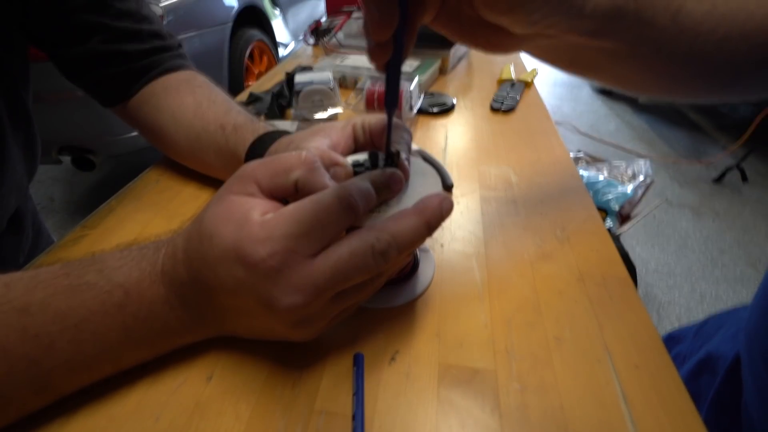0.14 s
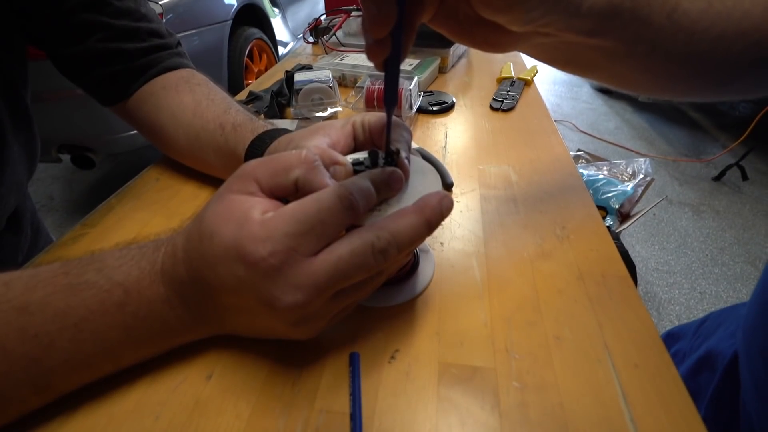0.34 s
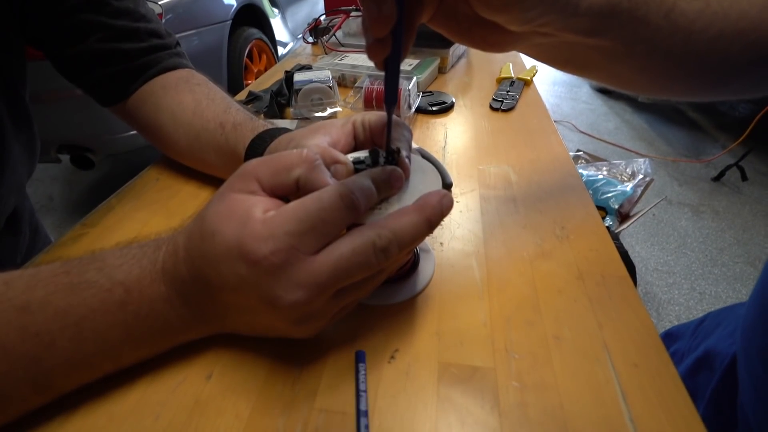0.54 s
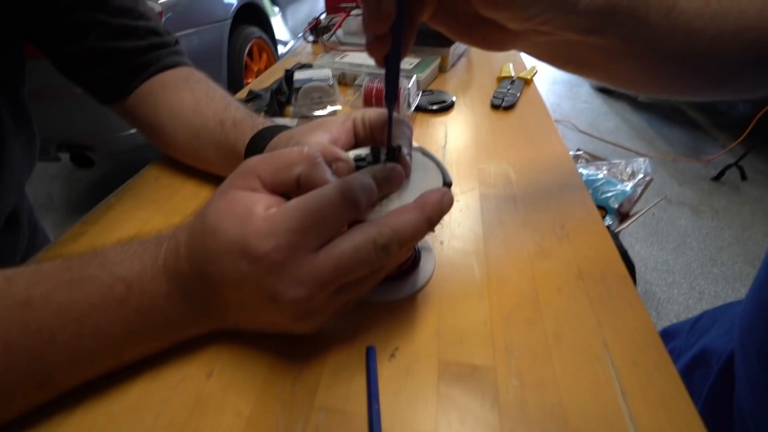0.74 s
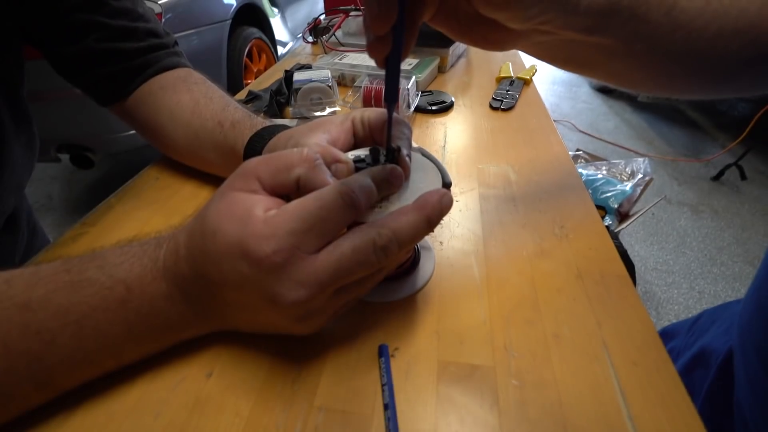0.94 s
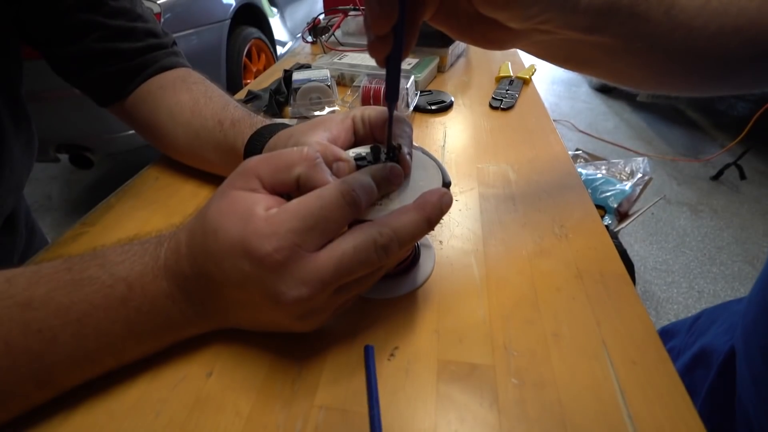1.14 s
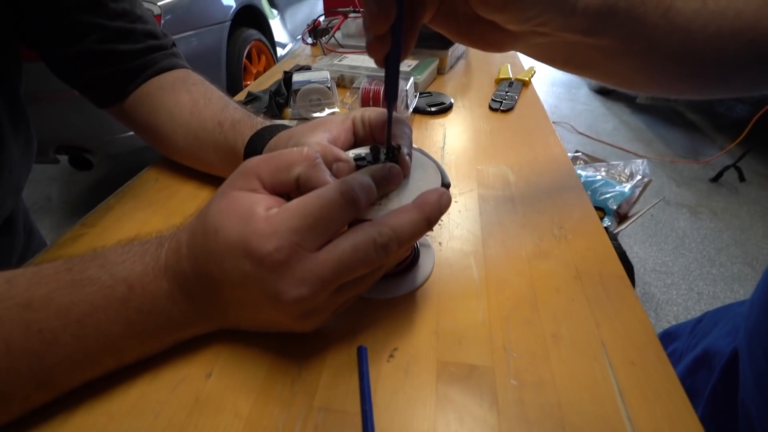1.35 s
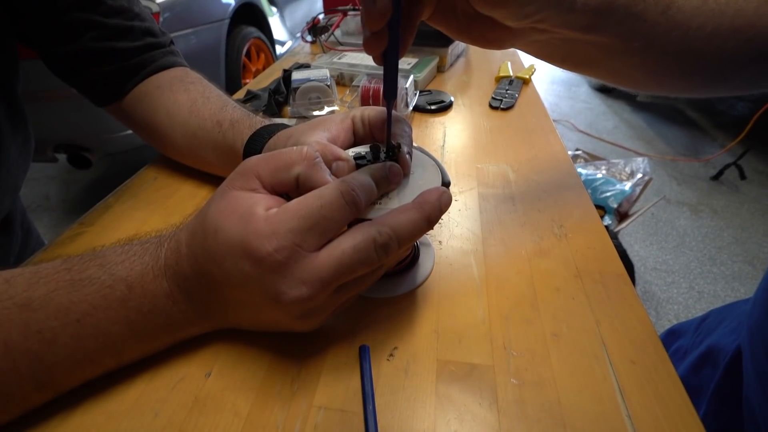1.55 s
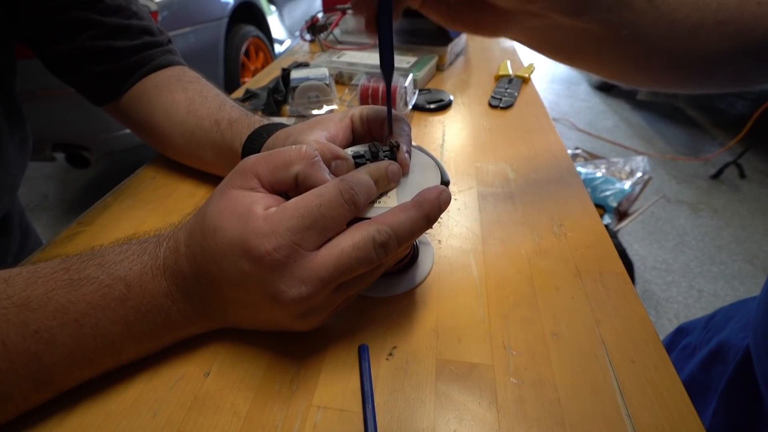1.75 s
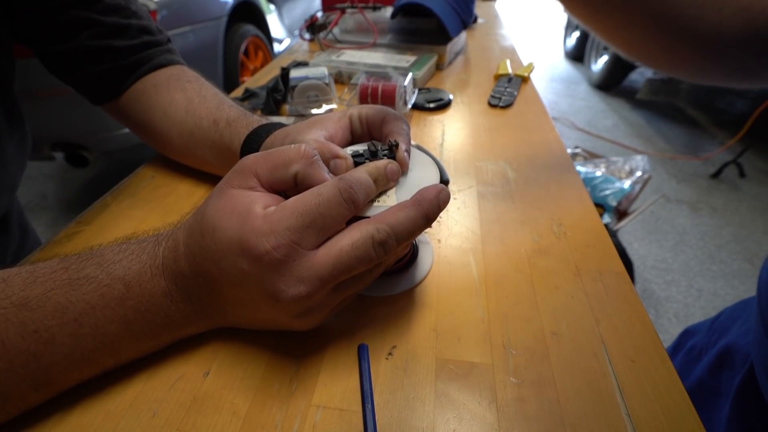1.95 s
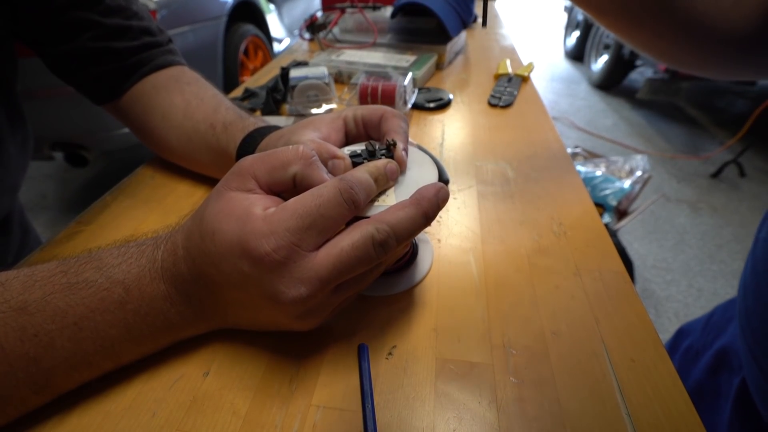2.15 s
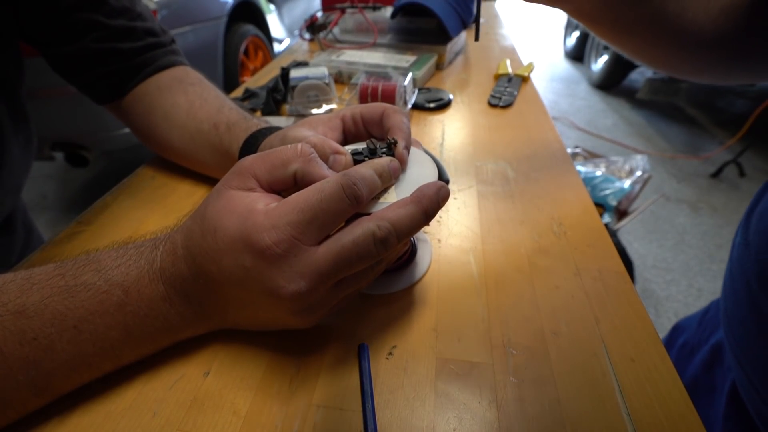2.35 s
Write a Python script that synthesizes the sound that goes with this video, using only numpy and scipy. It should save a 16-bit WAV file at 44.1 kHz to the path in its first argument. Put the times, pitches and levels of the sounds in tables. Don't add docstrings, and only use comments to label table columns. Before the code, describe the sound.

A hammer hits a steel punch on a wooden bench in five quick, even blows, each with a woody boom and rattle of loose tools, then quiet garage hum; close, small overloading microphone.

```python
import sys
import numpy as np
from scipy import signal
from scipy.fft import rfft, irfft
from scipy.io import wavfile
from scipy.ndimage import uniform_filter1d

SR = 44100
rng = np.random.default_rng(int(sys.argv[2]) if len(sys.argv) > 2 else 0)


def master(y):
    cut = np.clip(np.atleast_2d(y).T, -1, 1)
    pcm = np.round(cut * 32767)
    wavfile.write(sys.argv[1], SR, pcm.astype(np.int16))


def gain_from_decibels(decibels):
    exponent = np.asarray(decibels, float) / 20
    return 10 ** exponent


N = 110250

# start_s, strength_db, tick_db
BLOWS = [
    (-.09, -1, 0),
    (.2028, 1.5, -1.5),
    (0.4948, 3, 3.5),
    (0.7842, 4.5, 5.5),
    (1.0505, 4, 6.5),
    (1.3543, 1, 1.5),
]
TICK_DB, TICK_S, CRACK_DB, CRACK_T60_S = -24, 0.0016, 2, 0.049
# freq_hz, density_db_per_hz
TICK_SPECTRUM = [(710, -2), (1200, 7), (2300, -19.5), (4220, -45), (5530, -15.5), (11200, -27.5),
                 (13200, -24), (16000, -31)]
# pitch_hz, level_db, t60_s
PUNCH_MODES = [(3632, -18, 0.014), (1600, -19.5, 0.01), (2640, -32, 0.042), (6720, -29, 0.0064)]
# delay_s, level_db
ECHOES = [(.0036, -3), (.0075, -35), (0.014, -10.5)]
BOOM_LAG_S, PUSH_DB, PUSH_S = .0008, 5, 0.00104
REBOUND_DB, REBOUND_HZ, REBOUND_T60_S = 3.5, 173.3, 0.023

# pitch_hz, level_db, t60_s
BENCH_MODES = [(87.9, -9.5, .3), (181.8, -3.5, 0.32), (266.3, -7.5, 0.4), (280.2, -8.5, 0.43),
               (362.5, -5.5, 0.33), (431.9, -5, 0.25), (454.3, -9, 0.36), (502, -10.5, 0.36),
               (585, -11, 0.38), (710, -51, 0.067), (770, -5, 0.18), (830, -3.5, 0.25), (986, -6.5, 0.28),
               (1071, -16, 0.24)]
BENCH_DB, BLOW_SCATTER_DB, DETUNE_RATIO = -14, 1.5, .0062
SPLIT_HZ, TWIN_DB = 17, -2
# freq_hz, density_db_per_hz
TAIL_SPECTRUM = [(24, -55), (40, -9), (167, 1), (790, -4.5), (1120, -16), (7000, -40.5), (8770, -43.5),
                 (9450, -46), (16000, -43)]
TAIL_DB, TAIL_RISE_S = -19.5, 0.004
# freq_hz, t60_s
GARAGE_DECAY = [(60, 0.25), (200, 0.99), (500, 0.72), (1000, 0.87), (3000, 1), (8000, 0.61), (15000, 0.27)]

# peak_s, level_db
RATTLES = [(-.05, -22.5), (.24, -27.5), (.536, -25.5), (.829, -24), (1.095, -26.5), (1.391, -30.5)]
RATTLE_RISE_S, RATTLE_FALL_S, RATTLE_THUMP_DB = 0.011, .016, -9.5
# freq_hz, density_db_per_hz
RATTLE_SPECTRUM = [(650, -8), (1100, -3), (3010, -11.5), (4130, -12.5), (5340, -19.5), (9140, -23.5),
                   (16000, -51)]
# start_s, level_db, spread_s, thump_db
BOUNCES = [(.26, -34, 0.023, -9.5), (.554, -17.5, 0.0096, -8.5), (0.586, -24.5, 0.0054, -41),
           (0.8621, -20, .007, -9), (0.916, -31, 0.0082, -15.5), (1.125, -22.5, 0.008, -12),
           (1.162, -20.5, 0.0042, -46), (1.185, -31, .004, -44), (1.205, -26.5, 0.0057, -25.5),
           (1.229, -34.5, 0.015, -49), (1.401, -19.5, 0.0032, -46), (1.431, -25.5, 0.0034, -25.5),
           (1.456, -34.5, 0.013, -38), (1.935, -47, .003, -55), (2.041, -43.5, .004, -54),
           (2.48, -57, .003, -45)]
# freq_hz, density_db_per_hz
CLATTER_SPECTRUM = [(500, -40), (1100, -4), (1800, -1.5), (2300, -11.5), (4000, -18.5), (7000, -33.5),
                    (10000, -43), (16000, -60)]
THUMP_TILT_DB_PER_OCTAVE = 1
LANDING_LEAD_S = .025

# start_s, length_s, pair_db, upper_db, upper_hz, low_db
RINGS = [
    (.563, 0.25, -61, -52, 9290, -70),
    (.864, 0.18, -53.5, -51.5, 9230, -45),
    (1.161, 0.23, -52, -56, 9280, -44.5),
    (1.426, 0.172, -59.5, -61, 9300, -45),
]
# first_hz, second_hz
PAIR_HZ = (6848, 6918)
PAIR_T60_S, TWIN_EXTRA_T60_S, UPPER_T60_S = 1.6, 0.67, 0.65
LOW_RING_HZ, LOW_T60_S, RING_RISE_S = 3142, 0.39, 0.018
WAVER_DB, WAVER_S = 2, 0.018

# time_s, level_db
SHUFFLE = [(0, -58.5), (.2, -58), (.5, -58), (.8, -61), (1.4, -80), (2.5, -70.5)]
# low_hz, high_hz
SHUFFLE_BAND_HZ = (3280, 8700)

# freq_hz, density_db_per_hz
HUM_SPECTRUM = [(15, -40), (25, -4.5), (161, 0), (394, -10.5), (545, -4.5), (863, -13.5), (1020, -13),
                (4370, -32), (16000, -57)]
HUM_DB = -42.5
# pitch_hz, peak_db
WHINES = [(172, -50.5), (572, -68.5), (989, -57), (4280, -76), (5200, -77), (10400, -84)]

AIR_DB, AIR_HZ, TOP_HZ = -73, 9000, 15700
CLIP, KNEE, LOW_CUT_HZ = .88, 10, 50


def evened(x):
    return x / np.sqrt(np.mean(x ** 2) + 1e-20)


def read(points, hz):
    f, value = np.transpose(points)
    return np.interp(np.log(hz + 1), np.log(f + 1), value)


def add(mix, s, sound):
    at = round(s * SR)
    sound = sound[max(-at, 0):]
    part = mix[max(at, 0):][:len(sound)]
    part += sound[:len(part)]


def coloured(spectrum, size):
    gain = gain_from_decibels(read(spectrum, np.fft.rfftfreq(size, 1 / SR)))
    return evened(irfft(rfft(rng.standard_normal(size)) * gain, size))


def blows():
    out, t = np.zeros(N), np.arange(4096) / SR
    for s, db, tick_db in BLOWS:
        steel_db = db + tick_db
        tick = t / TICK_S * np.exp(1 - t / TICK_S) * coloured(TICK_SPECTRUM, size=4096)
        crack_shape = gain_from_decibels(CRACK_DB - 60 * t / CRACK_T60_S) * np.minimum(t / TICK_S, 1)
        crack = crack_shape * coloured(TICK_SPECTRUM, size=4096)
        add(out, s, gain_from_decibels(steel_db + TICK_DB) * (tick + crack))
        for hz, mode_db, t60 in PUNCH_MODES:
            add(out, s, gain_from_decibels(steel_db + mode_db - 60 * t / t60) * np.sin(2 * np.pi * hz * t))
        for delay, echo_db in ECHOES:
            add(out, s + delay, gain_from_decibels(steel_db + TICK_DB + echo_db) * np.gradient(tick) * 2)

        boom_s = s + BOOM_LAG_S
        push = -gain_from_decibels(PUSH_DB) * np.sin(np.pi * np.minimum(t / PUSH_S, 1))
        rebound = gain_from_decibels(REBOUND_DB - 60 * t / REBOUND_T60_S) * np.sin(2 * np.pi * REBOUND_HZ * t)
        add(out, boom_s, gain_from_decibels(db) * push)
        add(out, boom_s + PUSH_S, gain_from_decibels(db) * rebound)
        add(out, boom_s, gain_from_decibels(db + BENCH_DB) * bench(BLOW_SCATTER_DB, phase_spread_rad=0.93))
        add(out, boom_s, gain_from_decibels(db) * garage_tail())
    return out


def bench(scatter_db, phase_spread_rad, tilt_db=0):
    t = np.arange(SR // 2) / SR
    hz, db, t60 = np.transpose(BENCH_MODES)[:, :, None]
    draws = rng.standard_normal((4, len(BENCH_MODES), 1))
    scatter, detune, phase, split = np.clip(draws, -1.5, 1.5)
    level_db = db + scatter_db * scatter + tilt_db * np.log2(hz / 500) - 60 * t / t60
    turn = 2 * np.pi * hz * (1 + DETUNE_RATIO * detune) * t + phase_spread_rad * phase
    split_hz = SPLIT_HZ * (split + np.sign(split) / 2)
    twin = gain_from_decibels(TWIN_DB) * np.sin(turn + 2 * np.pi * split_hz * t)
    return -(gain_from_decibels(level_db) * (np.sin(turn) + twin)).sum(0)


def garage_tail():
    hz, t, z = signal.stft(coloured(TAIL_SPECTRUM, size=SR), SR, nperseg=512)
    decay = gain_from_decibels(-60 * t / read(GARAGE_DECAY, hz)[:, None])
    tail = signal.istft(z * decay, SR, nperseg=512)[1]
    rise = 1 - np.exp(-np.arange(len(tail)) / SR / TAIL_RISE_S)
    return gain_from_decibels(TAIL_DB) * tail * rise


def bounces():
    out, t = np.zeros(N), np.arange(4096) / SR
    soft = np.sin(np.pi / 2 * np.minimum(np.arange(SR // 2) / 88, 1)) ** 2
    from_peak = t - LANDING_LEAD_S
    for s, db in RATTLES:
        rise = np.exp(-(from_peak / RATTLE_RISE_S) ** 2)
        fall = np.exp(-from_peak / RATTLE_FALL_S)
        shape = np.where(t < LANDING_LEAD_S, rise, fall)
        add(out, s - LANDING_LEAD_S, gain_from_decibels(db) * grainy(RATTLE_SPECTRUM, 1.9, shape))
        thump = bench(5.4, 1.74, THUMP_TILT_DB_PER_OCTAVE) * soft
        add(out, s - .005, gain_from_decibels(RATTLE_THUMP_DB + BENCH_DB) * thump)
    for s, db, spread_s, thump_db in BOUNCES:
        shape = (t > LANDING_LEAD_S) * np.exp(-abs(from_peak) / spread_s)
        add(out, s - LANDING_LEAD_S, gain_from_decibels(db) * grainy(CLATTER_SPECTRUM, 1.4, shape))
        thump = bench(6.2, 1.77, THUMP_TILT_DB_PER_OCTAVE) * soft
        add(out, s, gain_from_decibels(thump_db + BENCH_DB) * thump)
    return out


def grainy(spectrum, depth_db, shape):
    grains = evened(uniform_filter1d(rng.standard_normal(4096), size=60))
    noise = gain_from_decibels(depth_db * grains) * rng.standard_normal(4096)
    gain = gain_from_decibels(read(spectrum, np.fft.rfftfreq(4096, 1 / SR)))
    return irfft(rfft(noise * shape) * evened(gain))


def rod():
    out = np.zeros(N)
    for s, length, pair_db, upper_db, upper_hz, low_db in RINGS:
        t = np.arange(0, length, 1 / SR)
        first = wavering_tone(PAIR_HZ[0], t)
        second = gain_from_decibels(-60 * t / TWIN_EXTRA_T60_S) * wavering_tone(PAIR_HZ[1], t)
        pair = gain_from_decibels(pair_db - 60 * t / PAIR_T60_S) * (first + second)
        low = gain_from_decibels(low_db - 60 * t / LOW_T60_S) * wavering_tone(LOW_RING_HZ, t)
        swell = np.sin(np.pi * t / length) ** 0.56
        upper = gain_from_decibels(upper_db - 60 * t / UPPER_T60_S) * wavering_tone(upper_hz, t) * swell
        fade = np.minimum(t / RING_RISE_S, 1) * np.minimum((length - t) / .01, 1)
        add(out, s, (pair + low + upper) * fade)
    return out


def wavering_tone(hz, t):
    window = np.hanning(round(2 * WAVER_S * SR))
    waver = evened(signal.fftconvolve(rng.standard_normal(len(t)), window, "same"))
    phase = 2 * np.pi * rng.random()
    return gain_from_decibels(WAVER_DB * waver) * np.sqrt(2) * np.sin(2 * np.pi * hz * t + phase)


def shuffle():
    band = signal.butter(N=4, Wn=SHUFFLE_BAND_HZ, btype="band", fs=SR, output="sos")
    level_db = np.interp(np.arange(N) / SR, *np.transpose(SHUFFLE))
    return gain_from_decibels(level_db) * evened(signal.sosfilt(band, rng.standard_normal(N)))


def hum():
    out = gain_from_decibels(HUM_DB + 1.0 * slow_drift()) * coloured(HUM_SPECTRUM, size=N)
    for hz, db in WHINES:
        turn = 2 * np.pi * np.cumsum(hz + 5.4 * slow_drift()) / SR
        out += gain_from_decibels(db + 3.0 * slow_drift()) * np.sin(turn)
    return out


def slow_drift():
    once = uniform_filter1d(rng.standard_normal(N), size=3000)
    return evened(uniform_filter1d(once, size=3000))


def scene():
    return (blows() + bounces() + rod() + shuffle() + hum())[None]


def top_cut(x):
    return signal.sosfilt(signal.butter(12, 16550, fs=SR, output="sos"), x)


def record(dry):
    high_pass = signal.butter(2, AIR_HZ, "high", fs=SR)
    hiss = gain_from_decibels(AIR_DB) * evened(signal.lfilter(*high_pass, rng.standard_normal(N)))
    band_limit = signal.cheby2(N=10, rs=50, Wn=TOP_HZ + 500, fs=SR, output="sos")
    banded = signal.sosfilt(band_limit, dry + hiss)
    squeezed = banded / (1 + abs(banded / CLIP) ** KNEE) ** (1 / KNEE)
    cut = signal.lfilter(*signal.butter(1, LOW_CUT_HZ, "high", fs=SR), squeezed)
    return top_cut(np.clip(cut, -1, 1))


dry = scene()
out = record(dry)
master(out)
```